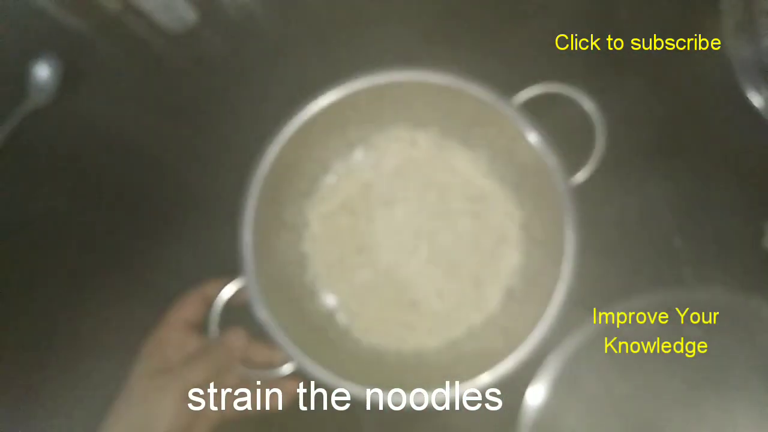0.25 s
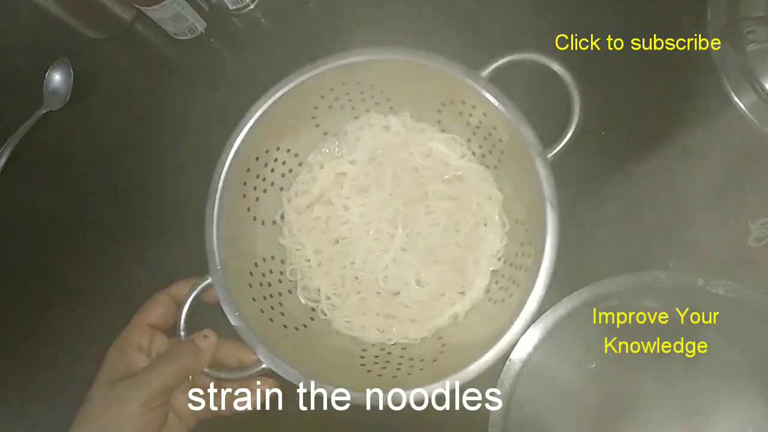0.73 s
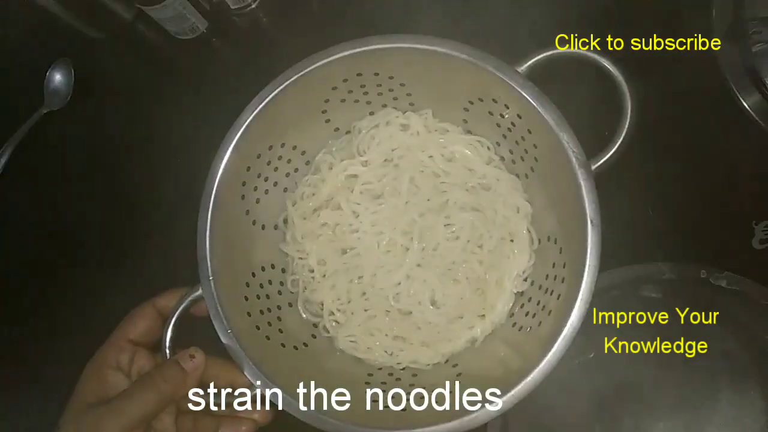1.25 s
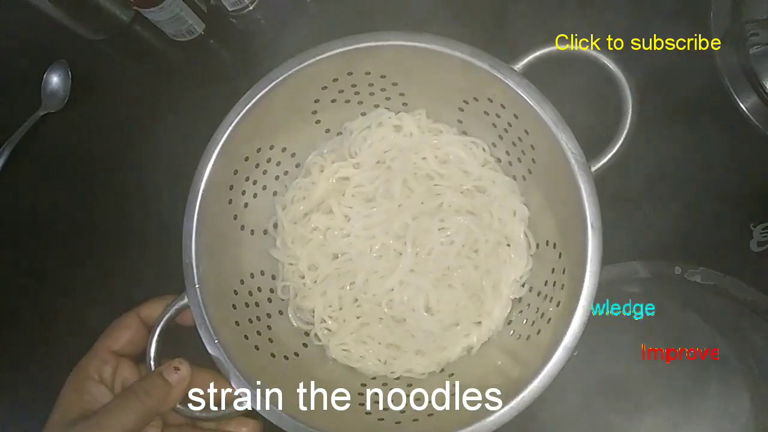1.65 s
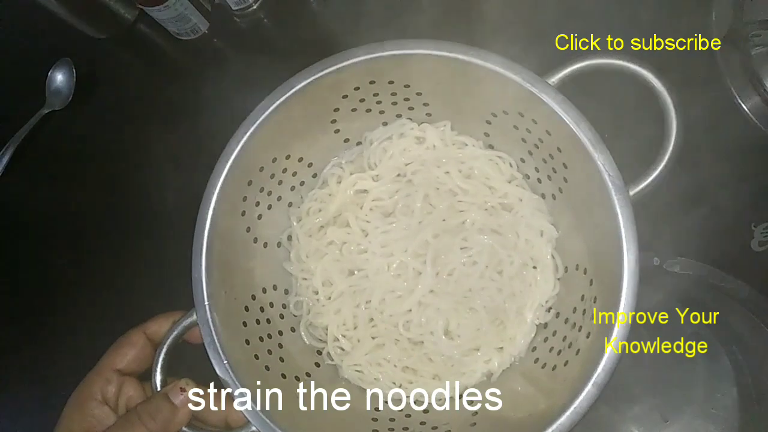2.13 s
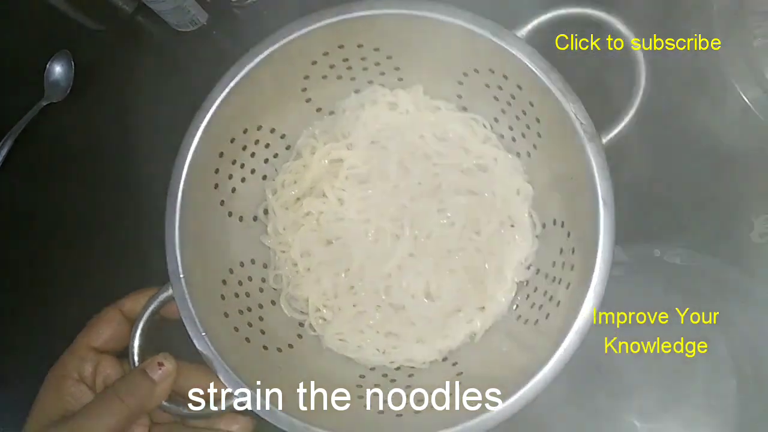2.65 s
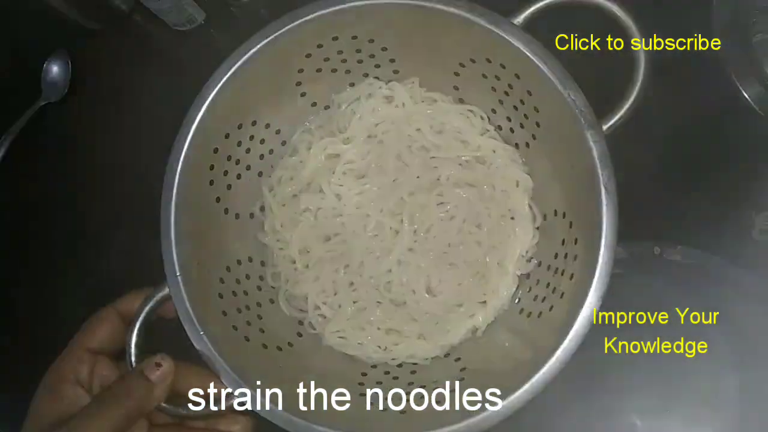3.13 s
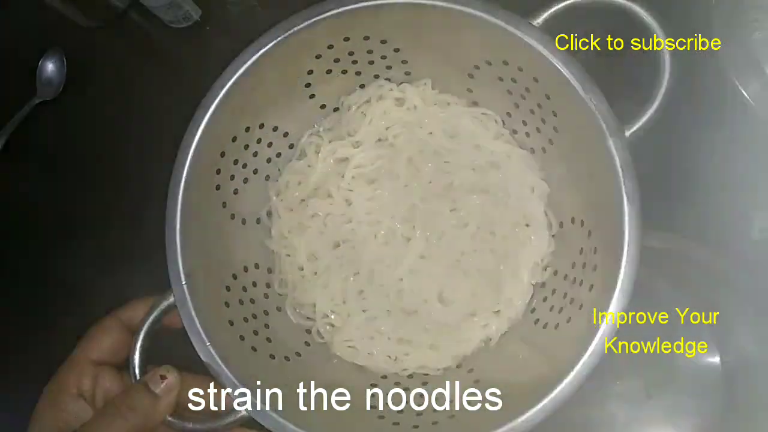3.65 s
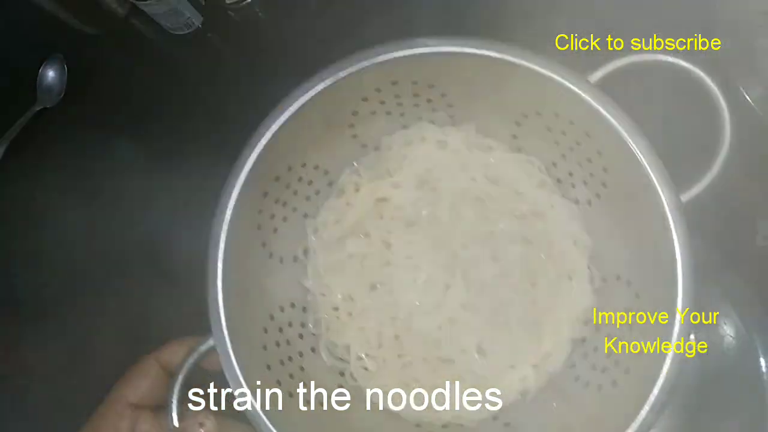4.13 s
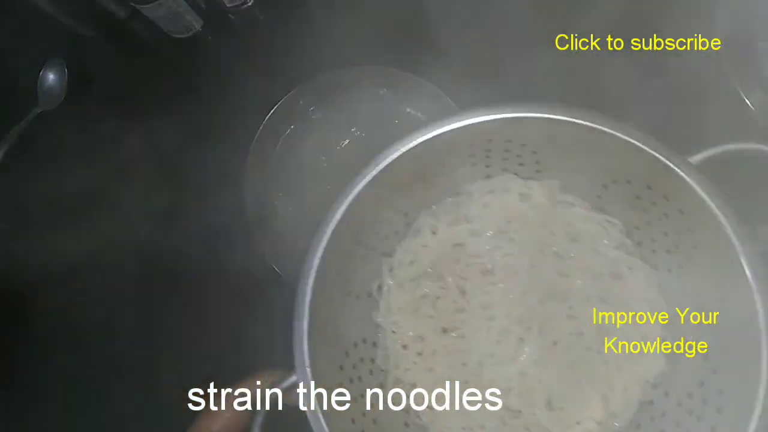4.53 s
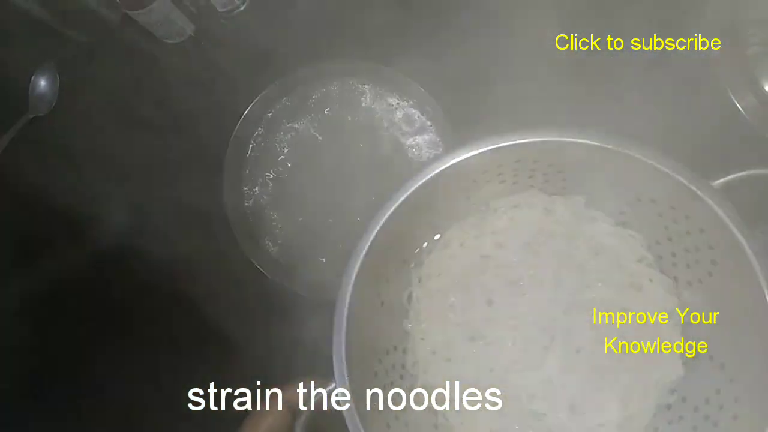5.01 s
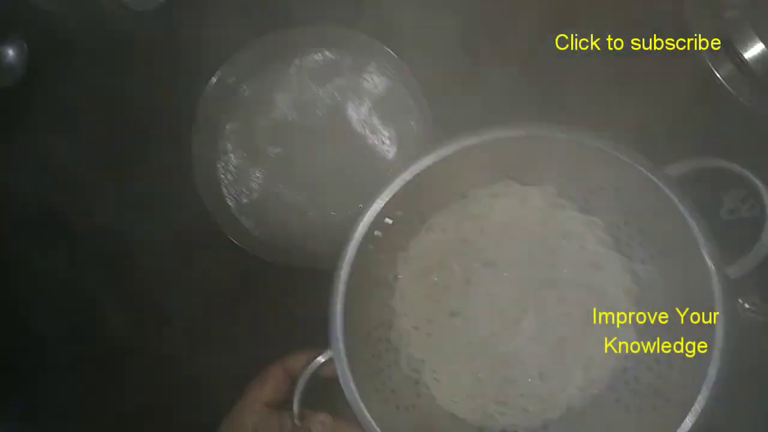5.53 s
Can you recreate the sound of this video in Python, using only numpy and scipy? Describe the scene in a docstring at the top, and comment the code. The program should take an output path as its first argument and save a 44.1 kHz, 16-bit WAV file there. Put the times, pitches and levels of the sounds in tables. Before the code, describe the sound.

Quiet kitchen air hums and hisses throughout, with a few soft low bumps. A small dry tick comes at 0.3 s. At about 0.5 s a steel colander scrapes and rattles gritty on the counter for a quarter second. From 0.9 s water begins to run off, and from 1.2 to 2.2 s it streams into the pool below with bubbling plops and fine spray, a sharp splash near 1.85 s. It then thins to separate drips, clear plinks at 2.3 to 2.4 s and a bright high one at 3.65 s, with small hissing splashes between. Drips fade by 4.4 s. At 4.5 s steel knocks lightly; a double heavy clank at 4.9 s rings on, another knock follows at 5.3 s, then a drag with a brief squeal at 5.6 s and a final hard knock. The room is short and bright; the stereo microphone is above, its right side clearer.

```python
"""In a hard-walled kitchen a steel colander of noodles is lifted off a bowl: it scrapes, then water streams and
drips into the pool below. Drops are bubble sines that rise in pitch, spray is coloured clicks.
Early and again at the end the steel is knocked and dragged on the counter: clicks ring counter, bowl and rim.
A two-port microphone hears it from above; its right port is brighter and hears water and steel sooner."""
import sys
import numpy as np
from scipy import signal
from scipy.fft import rfft, irfft, next_fast_len
from scipy.io import wavfile
from scipy.ndimage import uniform_filter1d

SR = 44100
rng = np.random.default_rng(int(sys.argv[2]) if len(sys.argv) > 2 else 0)


def transcribe(signal):
    """Save signal, clipped to [-1, 1], as a 16-bit WAV file at the path in sys.argv[1]."""
    frames = np.atleast_2d(signal).T
    limited = np.clip(frames, -1, 1)
    pcm = np.round(limited * 32767).astype(np.int16)
    wavfile.write(sys.argv[1], SR, pcm)


N = 254491
T = np.arange(N) / SR  # s


def undb(db):
    """dB to gain."""
    return 10 ** (np.asarray(db) / 20)


def unit(x):
    """Scale to rms 1."""
    return x / np.sqrt(np.mean(x ** 2))


def curve(rows):
    """Draw each column of a table as a line over time."""
    s, *columns = np.transpose(rows)
    return [np.interp(T, s, c) for c in columns]


def colour(x, points):
    """Equalise a sound by (Hz, dB) points, joined on a log frequency axis."""
    hz, db = np.transpose(points)
    size = next_fast_len(x.shape[-1])
    f = np.maximum(np.arange(size // 2 + 1) * SR / size, 1)
    gain = undb(np.interp(np.log(f), np.log(hz), db, -90, db[-1]))
    return irfft(rfft(x, size) * gain, size)[..., :x.shape[-1]]


def ring(x, modes):
    """A body's modes, each a resonance applied twice, so the valleys stay dark."""
    out = 0
    for hz, width, db in modes:
        b, a = signal.iirpeak(hz, hz / max(1.32 * width, 4), SR)
        once = signal.lfilter(b, a, x)
        out = out + undb(db) * signal.lfilter(b, a, once)
    return out


def grains(per_s, spread_db):
    """Random clicks of very unequal size, rms 1."""
    hit = rng.random(N) < per_s / SR
    size_db = spread_db * np.minimum(rng.exponential(1, N), 4)
    return unit(hit * rng.standard_normal(N) * undb(size_db))


def wide(per_s, spread_db):
    """Clicks from a broad source: the same moments at both ports, partly different waves."""
    hit = rng.random(N) < per_s / SR
    size = undb(spread_db * np.minimum(rng.exponential(1, N), 4)) * hit
    shared, own = rng.standard_normal(N), rng.standard_normal((2, N))
    return unit(size * (.5 * shared + own))


def fade(s, t60, rise=0.000087):
    """Envelope that starts at s and dies away by 60 dB per t60."""
    t = np.maximum(T - s, 0)
    return (1 - np.exp(-t / rise)) * 1000 ** (-t / max(t60, .01))


def sides(x, pan_db):
    """Place a sound between the ports; positive leans left."""
    return x * undb(np.array([[pan_db], [-pan_db]]) / 2)


def late(x, count):
    """The left port hears a few samples later."""
    return np.array([np.roll(x[0], count), x[1]])


def add_bubble(out, s, db, hz, pan_db, cycles, glide):
    """Mix in one bubble: a sine, rising in pitch if it glides, that dies within a few cycles."""
    turns = np.arange(int(5 * cycles * SR / hz)) * hz / SR
    tone = np.sin(2 * np.pi * (turns + glide * turns ** 2 / cycles / 2))
    wave = tone * np.exp(-turns / cycles) * (1 - np.exp(-3 * turns / cycles))
    i = int(s * SR)
    piece = sides(undb(db) * wave / np.abs(wave).max(), pan_db)[:, :N - i]
    out[:, i:i + piece.shape[1]] += piece


# drops that trap a bubble: (time [s], peak level [dB], bubble pitch [Hz])
DRIPS = [(1.133, -47, 1590), (1.245, -33, 1095), (1.263, -29, 3250), (1.363, -37.5, 1070),
         (1.398, -33.5, 2300), (1.531, -25, 2560), (1.537, -44, 850), (1.598, -39, 1090),
         (1.622, -34, 1485), (1.624, -38, 696), (1.675, -39, 755), (1.722, -32, 1530), (1.762, -51, 734),
         (1.792, -37, 1020), (1.842, -34, 638), (1.895, -52, 715), (1.936, -41, 1390), (2.004, -32, 2420),
         (2.029, -33, 1730), (2.033, -38, 596), (2.088, -38.5, 1480), (2.27, -26.5, 1726),
         (2.309, -28.5, 2270), (2.391, -25.5, 2180), (2.43, -35, 1690), (2.534, -37, 1490),
         (2.626, -36.5, 1740), (2.692, -38, 1620), (2.807, -36, 1710), (2.837, -48, 940), (2.862, -47, 890),
         (2.892, -40.5, 906), (2.909, -42.5, 853), (3.013, -38.5, 1810), (3.106, -39, 1080),
         (3.109, -37, 1760), (3.325, -36, 1030), (3.361, -37.5, 850), (3.417, -43, 1010),
         (3.517, -41.5, 2240), (3.559, -37, 1300), (3.579, -40.5, 3020), (3.646, -20, 3780),
         (3.665, -28, 3600), (3.701, -39.5, 1030), (3.756, -34.5, 1700), (3.785, -35, 956),
         (3.786, -40, 1470), (3.865, -51, 683), (3.999, -44.5, 926), (4.161, -33.5, 1276),
         (4.219, -35, 1525), (4.224, -34.5, 2770), (4.435, -45, 1830)]
DRIP_CYCLES, DRIP_GLIDE = 2.9, .04  # decay constant in cycles for larger bubbles; pitch rise per decay constant
DRIP_PAN_DB = -2


def drips():
    """Single drops: an impact tick, the bubble, then droplets that fall back as smaller bubbles."""
    out = np.zeros((2, N))
    for (s, db, hz), droplets in zip(DRIPS, rng.random((len(DRIPS), 14, 3))):
        # the smallest bubbles ring for more cycles
        cycles = DRIP_CYCLES * max(hz / 1800, 1) ** 0.9
        add_bubble(out, s, db, hz, DRIP_PAN_DB, cycles, DRIP_GLIDE)
        # the tick is fainter for higher-pitched drops
        tick_hz = min(1.51 * hz, 4300)
        add_bubble(out, s, db - hz / 400, tick_hz, DRIP_PAN_DB, 1.6, DRIP_GLIDE)
        for delay, size, pitch in droplets:
            droplet_s = s + 0.004 + 0.085 * delay
            droplet_db = db - 9.5 - 11 * size - 11 * delay
            droplet_hz = min(hz * 2 ** (0.9 * pitch - 0.35), 4300)
            add_bubble(out, droplet_s, droplet_db, droplet_hz, DRIP_PAN_DB, 1.5 * cycles, DRIP_GLIDE)
    return signal.sosfilt(signal.butter(2, 450, "high", fs=SR, output="sos"), out)


# running water, before the gushes: (time [s], small-bubble level [dB], spray level [dB])
STREAM = [(.88, -77, -81), (1.0, -66.5, -56), (1.13, -76.5, -56), (1.25, -58.5, -46), (1.39, -52, -45),
          (1.48, -62, -47), (1.62, -51.5, -45), (1.89, -50, -48), (1.97, -57.5, -52), (2.06, -52, -41.5),
          (2.15, -57.5, -50.5), (2.21, -61.5, -63), (2.75, -71.5, -62.5), (2.91, -60.5, -70),
          (3.2, -69, -61.5), (4.01, -76.5, -67.5), (4.5, -70.5, -75)]
# tone of the fine spray: (frequency [Hz], level [dB per Hz])
SPRAY = [(1470, 2), (2500, 11), (2990, 12.5), (4840, 6), (9580, 12.5), (14500, -3.5), (16000, -3)]
# a fuller stream traps larger, lower bubbles
BUBBLE_HZ, BUBBLE_AT_DB, DEEPER_OCT_PER_DB = 1252, -51.5, .02
GUSH, GUSH_DB = 1300, 2.3  # samples per gush; spread of its level before smoothing


def stream(per_s=650, octaves=0.715):
    """Small bubbles scattered round a pitch that sinks as the stream fills, and fine spray, in gushes."""
    bubbles_db, spray_db = curve(STREAM)
    centre_hz = BUBBLE_HZ * 2 ** (DEEPER_OCT_PER_DB * (BUBBLE_AT_DB - bubbles_db))
    first, last = STREAM[0][0], STREAM[-1][0]
    on = (T > first) & (T < last)
    bubbles = np.zeros((2, N))
    times = rng.uniform(first, last, int(per_s * (last - first)))
    for s, size, (pitch, pan) in zip(times, rng.exponential(1, N), rng.standard_normal((N, 2))):
        db = 3.5 * min(size, 4) + 1.5 * pitch
        hz = max(centre_hz[int(s * SR)] * 2 ** (octaves * pitch), 340)
        add_bubble(bubbles, s, db, hz, 3 * pan, 1.9, .06)
    spray = unit(colour(wide(4600, 4.7), SPRAY))
    # the flow comes in uneven gushes, half as strong in the spray
    steps = np.repeat(rng.standard_normal(N // GUSH + 1), GUSH)
    gush_db = GUSH_DB * uniform_filter1d(steps, GUSH)[:N]
    return on * (unit(bubbles) * undb(bubbles_db + gush_db) + spray * undb(spray_db + gush_db / 2))


# drops that burst into spray: (time [s], starting level [dB], spray pitch [Hz], t60 [s])
SPLASHES = [(0.946, -53, 8300, 0.82), (1.005, -39.5, 8700, .05), (1.844, -29, 9800, 0.073),
            (2.269, -47.5, 6800, 0.083), (3.146, -42, 8230, 0.24), (3.32, -42, 7650, 0.14),
            (3.42, -35.5, 7700, 0.031), (3.458, -34, 9800, 0.064), (3.646, -37.5, 3900, 0.15),
            (4.151, -54, 7540, 0.56), (4.366, -47, 7030, 0.51)]


def splashes():
    """Bursts of spray: dense droplet clicks in a band round one pitch start at once and die away."""
    out = 0
    for s, db, hz, t60 in SPLASHES:
        edges_hz = [0.66 * hz, min(1.273 * hz, 20000)]
        band = signal.butter(3, edges_hz, "band", fs=SR, output="sos")
        out = out + undb(db) * fade(s, t60) * unit(signal.sosfilt(band, wide(5600, 1.7)))
    return out


# steel meets counter; levels drive the layers below: (time [s], thud level [dB], thud pitch [Hz],
# blow peak level [dB], blow pitch [Hz], rattle level [dB], clatter level [dB], chatter t60 [s])
KNOCKS = [(0.485, -39.5, 248, -40, 2400, -38, -33, 0.088), (0.593, -43, 283, -48, 2300, -34.5, -44, 0.21),
          (4.492, -40.5, 505, -67, 2830, -35, -32.5, 0.4), (4.58, -58, 484, -48.5, 2940, -52.5, -43, 0.8),
          (4.637, -55, 435, -59, 1260, -56, -38.5, 0.052), (4.923, -25.5, 428, -11, 440, -33, -30, 0.57),
          (4.971, -41, 466, -14.5, 450, -30, -33.5, 0.59),
          (5.308, -40.5, 177.4, -30.5, 1940, -38.5, -29, 0.25),
          (5.615, -40.5, 480, -34, 3540, -41, -15.5, 0.029), (5.653, -32, 219, -20.5, 344, -75, -32, 0.51)]
# modes of the counter: (frequency [Hz], nominal width [Hz], level [dB])
COUNTER = [(160, 47.5, 6.5), (225, 30, 10), (272.3, 31, 7), (388, 34, 2), (419.5, 46, 3.5), (450, 33, 3.5),
           (520, 12, 1.5), (641, 81, -4)]
# modes of colander and bowl: (frequency [Hz], nominal width [Hz], level [dB])
STEEL = [(835.5, 18, -2.5), (920, 14, -5.5), (1124, 49, 2.5), (1508, 380, -4.5), (1660, 110, -6.5),
         (2226, 205, 6), (2336, 66, -6), (2384, 23, 6), (2515, 23, 11.5), (2820, 150, 5), (3465, 470, 1),
         (3650, 33, -1.5), (4260, 100, 0)]
# tone of the gritty contact: (frequency [Hz], level [dB per Hz])
GRIT = [(410, 15.5), (700, 0), (1120, 2), (1700, -1.5), (2300, 6), (4200, 3), (5200, 6), (9110, 8.5),
        (16000, -17)]
THUD_SHARE = 0.65  # thud t60 over chatter t60
HEAVY_DB = 3.5  # clatter that reaches the lower modes of the steel


def steel():
    """Knocks rattle and drags slip in dense clicks that ring the counter and the steel."""
    slips = grains(2500, 19.0)
    counter_force, steel_force, grit_force = force = np.zeros((3, N))  # row views
    blows, thuds = np.zeros((2, N)), np.zeros((2, N))
    for s, thud_db, thud_hz, blow_db, blow_hz, rattle_db, clatter_db, t60 in KNOCKS:
        counter_force += undb(thud_db + 1.5) * fade(s, THUD_SHARE * t60)
        add_bubble(thuds, s, thud_db - 6, thud_hz, 0, 1.6, 0)
        add_bubble(blows, s, blow_db, blow_hz, 0, 1.5, 0)
        # after the blow the base chatters to rest
        chatter = fade(s, t60, 0.00047)
        steel_force += undb(rattle_db) * chatter
        grit_force += undb(clatter_db) * chatter
    # taken before the drags join, so only knocks are heavy
    heavy = signal.lfilter(*signal.butter(2, 1300, fs=SR), slips * grit_force) * undb(HEAVY_DB)
    force += drags()
    # light chatter reaches only the upper modes
    light = signal.lfilter(*signal.butter(2, 1900, "high", fs=SR), slips * steel_force)
    counter_push = grains(5000, 4.0) * counter_force + thuds[0]
    steel_push = light + heavy + 3.47 * blows[0]
    out = blows
    for push, body in ((counter_push, COUNTER), (steel_push, STEEL)):
        out = out + ring(push, body) / np.std(ring(slips, body))
    out = signal.sosfilt(signal.butter(2, 100, "high", fs=SR, output="sos"), out)
    return out + grit_force * unit(colour(wide(9000, 0.38), GRIT))


# steel dragged on the counter: (full-pressure time [s], swell [s], hold [s],
# counter level [dB], steel level [dB], grit level [dB])
DRAGS = [(0.482, 0.0098, .21, -40, -34, -38.5), (5.249, 0.021, .055, -52.5, -87, -66),
         (5.581, 0.15, .2, -47, -32.5, -34)]
# sag of counter, steel and grit from full pressure on: (sag [dB per s])
SAG_DB_PER_S = [15, 153, 71]
SWELL_DB, RELEASE_DB_PER_S = 75, 449


def drags():
    """Force on counter, steel and grit: pressure swells, sags while it holds, then lets go."""
    force = 0
    for s, swell, hold, *levels_db in DRAGS:
        t = T - s
        swell_db = SWELL_DB * np.minimum(t, 0) / swell
        release_db = RELEASE_DB_PER_S * np.maximum(t - hold, 0)
        sag_db = np.c_[SAG_DB_PER_S] * np.maximum(t, 0)
        force = force + undb(np.c_[levels_db] + swell_db - release_db - sag_db)
    return force


# pressure as the rim squeals: (time [s], level [dB])
SQUEAL = [(5.5, -51), (5.545, -30), (5.58, -23.5), (5.612, -18), (5.63, -43), (5.69, -36), (5.77, -60)]
# modes of the rim, the last two high: (frequency [Hz], nominal width [Hz], level [dB])
RIM = [(1734, 50, -10), (1814, 30, -13), (1842, 24, 1), (1902, 50, -13), (2144, 80, -14), (3670, 400, -25),
       (6982, 90, -10)]


def squeal():
    """Stick-slip rubbing rings the rim as it slides; its high modes wake only near full pressure."""
    pressure = undb(curve(SQUEAL)[0]) * (T > SQUEAL[0][0])
    slips = grains(8000, 1.0)
    low = ring(slips * pressure, RIM[:5])
    high = ring(slips * pressure ** 2 / pressure.max(), RIM[5:])
    return (low + high) / np.std(ring(slips, RIM))


# long ringing of the steel around the late knocks, the first row hardly fading:
# (time [s], starting frequency [Hz], level before the envelope [dB], t60 [s])
STEEL_RING = [(4.76, 2480, -58, 10), (4.96, 2450, -26.5, 0.59), (5.31, 2298, -24.5, 0.31)]
RING_DRIFT_HZ_PER_S, RING_RISE_S = 100, 0.097  # slight downward drift; slow onset


def steel_ring(width_hz=200):
    """Long-ringing steel near 2.3-2.5 kHz: a narrow rough noise band, drawn with a slight pitch drift."""
    b, a = signal.butter(1, width_hz, fs=SR)
    noise = rng.standard_normal((2, N))
    real, imag = signal.lfilter(b, a, signal.lfilter(b, a, noise))
    out = 0
    for s, hz, db, t60 in STEEL_RING:
        turns = (hz - RING_DRIFT_HZ_PER_S * (T - s) / 2) * (T - s)
        band = np.real((real + 1j * imag) * np.exp(2j * np.pi * turns))
        out = out + undb(db) * fade(s, t60, RING_RISE_S) * unit(band)
    return out


# tone of the tick: (frequency [Hz], level [dB per Hz])
TICK = [(900, -34), (1350, 0), (2200, -21), (3500, -10), (5200, -1.5), (8000, -23)]
TICK_S, TICK_LENGTH_S, TICK_DB = .301, 0.021, -47  # start, length of the head, level before shaping


def tick():
    """A short dry tick of coloured clicks: a brief falling head over a softer fading tail."""
    head = np.clip((TICK_S + TICK_LENGTH_S - T) / 0.029, 0, 1)
    shape = head + 0.52 * fade(TICK_S, 0.19)
    return undb(TICK_DB) * (T > TICK_S) * shape * unit(colour(wide(6000, 0.54), TICK))


# soft low bumps, before panning: (time [s], starting level [dB], pitch [Hz], t60 [s])
BUMPS = [(0.631, -41, 76, 0.13), (0.778, -47.5, 102, 0.11), (1.387, -47, 129.4, 0.19),
         (1.429, -44.5, 102, 0.061), (2.554, -41, 82.5, 0.18), (4.496, -55, 74.5, 0.17),
         (4.926, -41, 80.5, 0.34), (5.399, -46, 64.4, 0.27)]
BUMP_PAN_DB = 4


def bumps():
    """Short low thumps, each a fading sine."""
    out = 0
    for s, db, hz, t60 in BUMPS:
        out = out + undb(db) * fade(s, t60, 0.00047) * np.sin(2 * np.pi * hz * (T - s))
    return out


ROOM_T60_S, ROOM_DB, ROOM_GAP_S = 0.24, 7.5, 0.0057  # t60 of the lows; tail gain; silence before the tail


def room(x):
    """Tiles and steel give a dense short tail, different at each port and longer in the treble."""
    t = T[:int(.8 * SR)]
    # single echoes stand out early, then blur
    uneven_db = 1.8 * np.exp(-t / 0.28) * rng.exponential(1, (2, len(t)))
    noise = rng.standard_normal((2, len(t))) * undb(uneven_db)
    low = signal.lfilter(*signal.butter(1, 3000, fs=SR), noise)
    low_tail = low * 1000 ** (-t / ROOM_T60_S)
    high_tail = (noise - low) * 1000 ** (-t / (1.36 * ROOM_T60_S))
    tail = (low_tail + high_tail) * (t > ROOM_GAP_S)
    tail = colour(tail, [(20, -12.5), (300, -2), (900, 4.5), (16000, 12.5)])
    tail = tail / np.sqrt(np.sum(tail ** 2) / 2)
    return undb(ROOM_DB) * signal.fftconvolve(x[None], tail, axes=1)[:, :N]


# tone of the kitchen air: (frequency [Hz], level [dB per Hz])
AIR = [(15, -65), (25, -12.5), (92, 3), (180, -5), (236, 0), (301, -6.5), (1070, -20), (1190, -23),
       (4370, -29.5), (6920, -21.5), (16000, -37)]
AIR_DB, DRAUGHT_DB = -69.5, -103.0


def air():
    """Quiet kitchen hum and hiss from coloured noise; slow draughts rumble at each port alone."""
    shared, own = rng.standard_normal(N), rng.standard_normal((2, N))
    murmur = colour(shared + 0.57 * own, AIR)
    draught = colour(rng.standard_normal((2, N)), [(10, -17), (40, 6), (90, -53), (200, -36)])
    return undb(AIR_DB) * unit(murmur) + undb(DRAUGHT_DB) * unit(draught)


def scene():
    """Water and steel share the room; bumps, tick and air stay dry."""
    water = late(drips() + stream() + splashes(), count=7)
    metal = late(steel() + steel_ring(), count=2)
    rim = squeal()
    # the bowl shields the water from the walls
    to_room = (undb(-4.5) * water + metal).mean(axis=0) + undb(-3.5) * rim
    return water + metal + rim + room(to_room) + sides(bumps(), BUMP_PAN_DB) + tick() + air()


# tone of the left port, before its 3 dB gain: (frequency [Hz], level [dB])
LEFT_PORT = [(500, -3), (2000, -3), (4000, -6), (8000, -18), (14000, -11)]
TOP_HZ = 15900


def record(dry):
    """The left port is duller; a steep low-pass cuts the top of both."""
    left = colour(dry[0], [(0.79, 0.0041)] + LEFT_PORT) * undb(3.0)
    both = np.array([left, dry[1]])
    return signal.sosfilt(signal.ellip(10, .2, 70, TOP_HZ, fs=SR, output="sos"), both)


dry = scene()
out = record(dry)
transcribe(out)
```